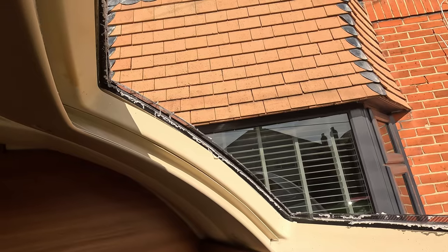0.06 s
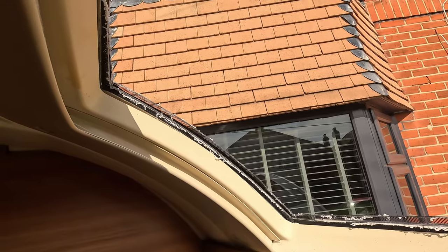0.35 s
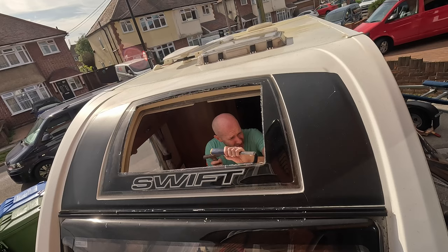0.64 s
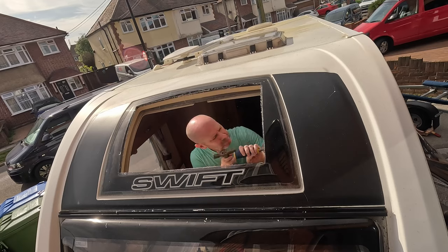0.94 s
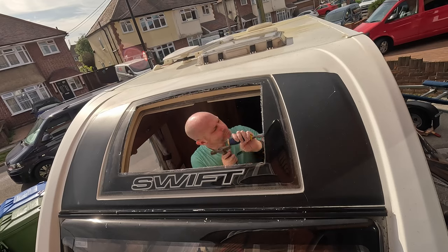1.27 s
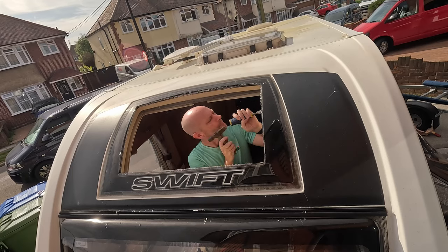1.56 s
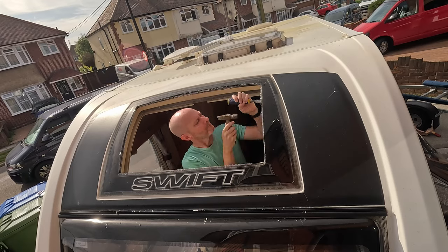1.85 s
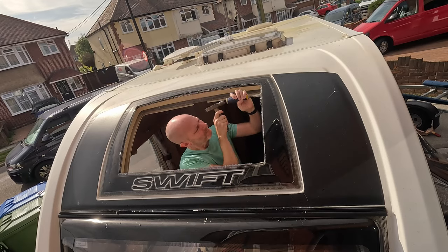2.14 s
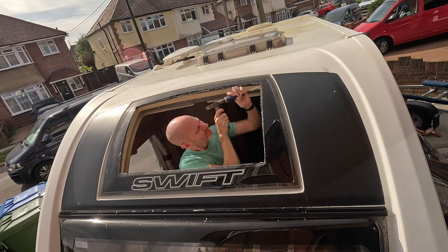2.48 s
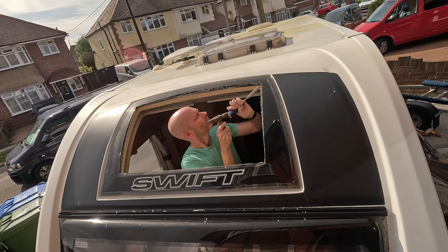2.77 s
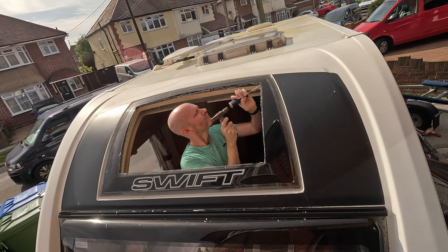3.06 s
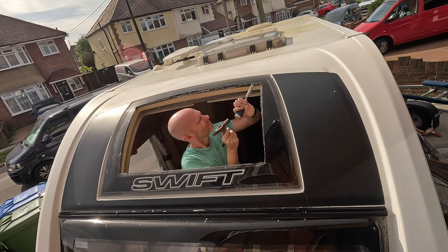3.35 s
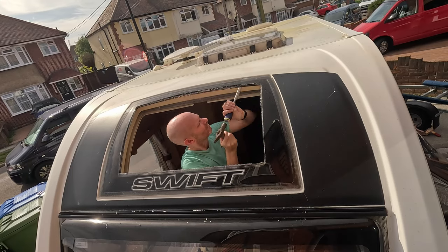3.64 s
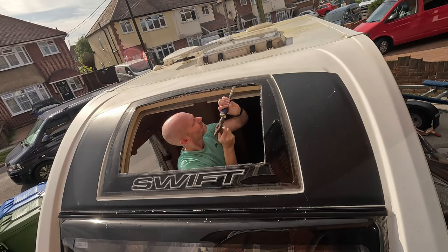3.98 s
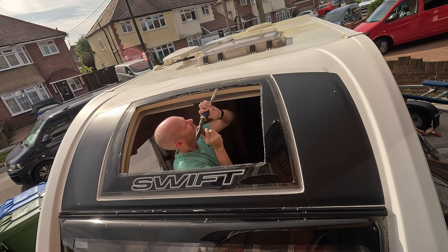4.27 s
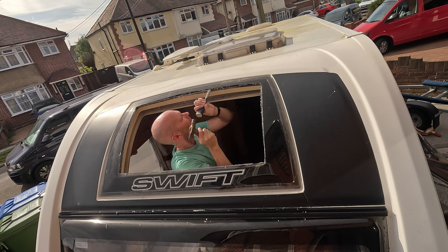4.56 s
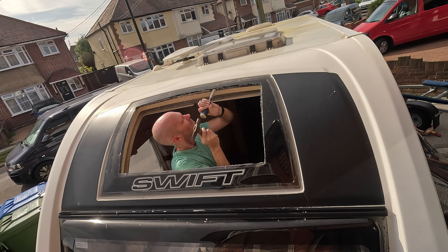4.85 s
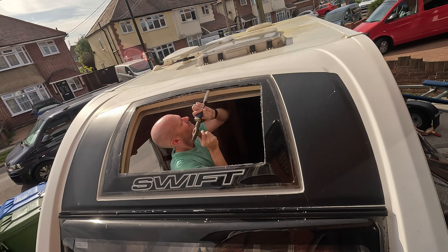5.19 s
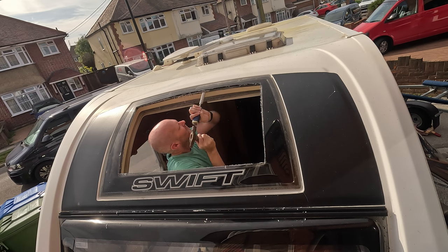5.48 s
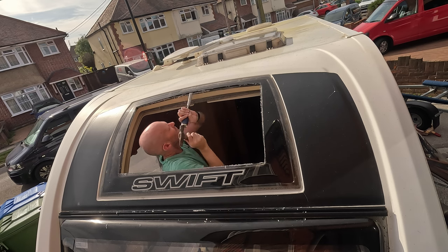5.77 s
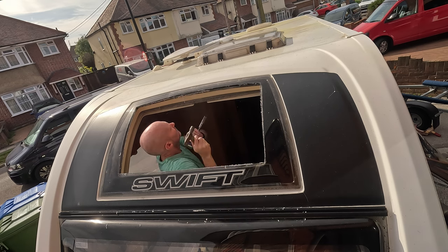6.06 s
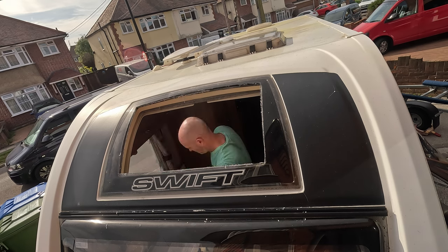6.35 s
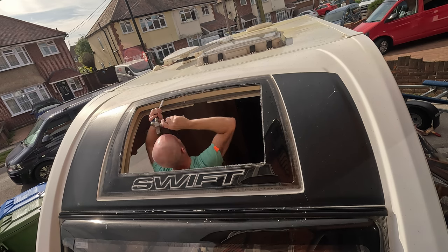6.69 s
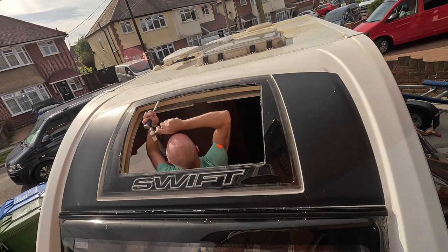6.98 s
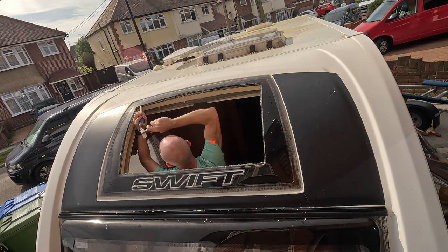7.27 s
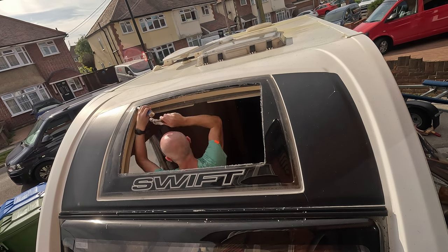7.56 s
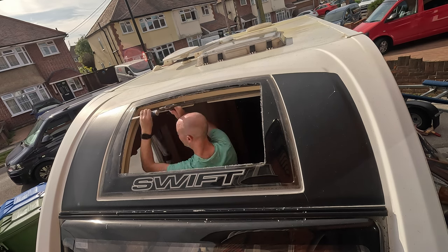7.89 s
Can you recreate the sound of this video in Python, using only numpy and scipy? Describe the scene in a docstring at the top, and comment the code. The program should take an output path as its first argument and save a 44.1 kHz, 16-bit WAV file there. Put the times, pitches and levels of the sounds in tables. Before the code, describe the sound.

Faint street air with a low rumble runs throughout. At about 0.55 seconds there is one sharp, close knock with a short hollow ring, followed by an instant of silence. From 0.7 seconds a hammer taps a chisel along a brittle plastic window frame in hurried, uneven clusters. Each tap makes a dull panel thud, a gritty rasp in the seal and a faint steel ring. Sharp plastic cracks, crumbling sealant and small scrapes fall between the taps, with stronger cracks around 1.7, 2.8 and 5 seconds. A faint low drone, like a distant engine, sits behind from 5 to nearly 7 seconds. The tapping pauses at 6 seconds and the tool rubs along the frame at about 6.3. Taps and cracks resume densely from 6.7 until the end, just after 8 seconds. The small cabin adds a very short echo.

```python
"""Chiselling a camper van window frame

A hammer taps a chisel along a brittle plastic window frame, the taps following each other quickly. Each tap
makes the wall panel thud, the seal rasp and the chisel ring faintly; sharp cracks come as the frame gives way.
Sealant crumbles around each blow and the tool rubs along the frame. The cabin adds a short echo, with street
air behind. Near the start there is one sharp, close knock."""
import sys
import numpy as np
from scipy import signal
from scipy.fft import rfft, irfft, next_fast_len
from scipy.io import wavfile
from scipy.ndimage import uniform_filter1d

SR = 44100
rng = np.random.default_rng(int(sys.argv[2]) if len(sys.argv) > 2 else 0)


def unload_audio(sound):
    """Save the sound as a 16-bit wav file, at the path given as the first command line argument."""
    columns = np.transpose(np.atleast_2d(sound))
    # keep every value between -1 and 1, then stretch to whole-number steps
    steps = np.round(np.clip(columns, -1, 1) * 32767)
    wavfile.write(sys.argv[1], SR, steps.astype(np.int16))


N = 358533
TIME = np.arange(N) / SR
BLOW_TIME = np.arange(-SR // 40, SR // 20) / SR   # from 25 ms before a blow to 50 ms after it
USUAL_BITE_DB = -46   # how loudly the blade usually bites into the seal
GRIT_DB, GRIT_DB_PER_S = -11.5, 1.36   # grit relative to the bite; the seal gets more brittle further on

# Hammer taps: start_s, panel_hz, thud_db, bite_db
TAPS = [ (0.6971, 259, -43, -51), (0.9314, 236, -40.5, -65), (1.0256, 214, -29.5, -51),
        (1.0614, 291, -25, -33.5), (1.1418, 233, -33, -43.5), (1.3264, 308, -27, -41.5),
        (1.3596, 235, -31.5, -39), (1.3935, 268, -34.5, -49.5), (1.4243, 302, -31.5, -40.5),
        (1.498, 290, -34.5, -54), (1.52, 268, -32, -46), (1.5522, 290, -39.5, -53), (1.641, 237, -31, -39),
        (1.716, 247, -33, -39.5), (1.8666, 228, -35, -55), (1.947, 233, -28, -39.5),
        (1.993, 238, -31.5, -37.5), (2.0452, 227, -39, -50), (2.07, 278, -30.5, -43),
        (2.1164, 208, -40.5, -53.5), (2.146, 198, -31.5, -45), (2.3422, 220, -37, -56),
        (2.3777, 231, -41, -55), (2.41, 186, -40.5, -52.5), (2.5597, 250, -30.5, -42.5),
        (2.9012, 235, -35.5, -54), (3.055, 248, -38, -42), (3.0894, 230, -33, -47),
        (3.124, 196, -38.5, -51), (3.4753, 190, -37.5, -58), (3.5036, 236, -25.5, -41),
        (3.5372, 198, -33, -46), (3.577, 230, -43, -46.5), (3.77, 185, -28.5, -50),
        (3.7965, 277, -31.5, -46.5), (3.83, 188, -30, -57), (3.8596, 183, -32, -47),
        (3.8897, 187, -30.5, -46.5), (3.92, 257, -25.5, -35.5), (3.9943, 235, -34, -48),
        (4.0232, 195, -28, -36.5), (4.0853, 230, -39, -48), (4.4115, 372, -42.5, -49),
        (4.438, 236, -34, -39), (4.473, 360, -32.5, -51), (4.5064, 184, -35.5, -51),
        (4.5516, 266, -30, -40), (4.6168, 254, -29.5, -39.5), (4.6462, 238, -28.5, -37.5),
        (4.677, 235, -32.5, -42.5), (4.8091, 238, -28.5, -49), (4.8218, 240, -23.5, -38.5),
        (4.854, 209, -29.5, -49), (5.001, 183, -29.5, -46), (5.4555, 276, -40, -47),
        (5.4914, 238, -33.5, -53), (5.5635, 332, -40, -62), (5.6601, 224, -28, -43.5),
        (5.689, 307, -39, -55), (5.9001, 236, -26.5, -47.5), (5.958, 252, -37, -47),
        (6.6653, 220, -31, -53.5), (6.712, 247, -42, -46), (6.7763, 254, -33, -53),
        (6.858, 266, -28.5, -40.5), (6.8898, 370, -30, -42), (6.9154, 344, -30.5, -35),
        (7.0843, 300, -35.5, -51), (7.1757, 210, -32.5, -42.5), (7.2066, 215, -29, -45.5),
        (7.261, 177, -40.5, -41.5), (7.2916, 172, -35.5, -42.5), (7.3118, 217, -28, -41.5),
        (7.3377, 217, -30, -42), (7.4971, 223, -26.5, -31), (7.5308, 243, -31.5, -45),
        (7.5588, 200, -29.5, -49), (7.5893, 205, -35.5, -44.5), (7.739, 209, -35, -43),
        (8.0058, 246, -32, -44.5), (8.0591, 243, -26.5, -39), (8.0884, 217, -34, -45)]
# Cracks in the frame, each loosening a piece: start_s, length_s, piece_hz, piece_db, splinter_db, thud_db
CRACKS = [ (.552, 0.00088, 1190, -20.5, -26.5, -35.5), (0.7988, 0.00038, 1700, -41.5, -43.5, -59),
          (0.9013, .0018, 1310, -29, -40, -53), (1.681, 0.0012, 1770, -32.5, -33.5, -34.5),
          (1.742, .00064, 1350, -52, -52.5, -59), (1.9135, 0.0014, 1270, -31.5, -50, -46),
          (2.0208, 0.0015, 2170, -42.5, -41.5, -56), (2.288, 0.0025, 1560, -36, -41, -46.5),
          (2.5235, 0.0025, 2000, -35.5, -42, -42.5), (2.7566, .0019, 2240, -37, -38.5, -39),
          (2.7745, 0.0024, 1950, -30.5, -36, -39.5), (3.4308, 0.00073, 2040, -50.5, -42.5, -44.5),
          (3.624, 0.0025, 2200, -43, -40, -51), (3.7554, 0.00064, 3100, -37.5, -41.5, -58),
          (4.8845, 0.0009, 2140, -31.5, -25, -35), (5.0314, 0.00042, 2030, -26, -25.5, -36.5),
          (5.289, 0.00053, 2180, -32, -29, -52), (5.3513, 0.0003, 2900, -57, -30.5, -42),
          (5.422, 0.0024, 2750, -43.5, -40, -42), (5.5042, 0.00068, 2340, -29, -34, -67),
          (6.701, 0.0022, 1970, -40, -47.5, -53), (6.805, 0.0016, 1450, -34, -40, -33.5),
          (6.9731, 0.00075, 1730, -33.5, -27, -47), (7.0577, 0.00066, 2340, -37, -28, -32.5),
          (7.1064, 0.0023, 2400, -38.5, -35.5, -35.5), (7.435, 0.0023, 1980, -36, -38, -60),
          (7.6585, .00052, 2160, -39, -42.5, -57), (7.7894, 0.0022, 1250, -36.5, -38.5, -46),
          (7.84, 0.0016, 1680, -31.5, -34.5, -41), (7.8706, 0.0014, 2700, -38, -34.5, -42),
          (7.9217, 0.0052, 1540, -34, -36.5, -55), (7.972, 0.0013, 2100, -32.5, -29.5, -69)]
# Scrapes of the blade along the seal: start_s, length_s, base_db
SCRAPES = [(1.11, 0.003, -60), (1.205, 0.003, -61.5), (1.561, 0.0038, -59), (1.594, 0.0017, -57),
           (1.843, 0.0023, -56), (2.211, 0.0033, -57), (2.463, 0.0029, -61), (2.964, 0.00071, -60.5),
           (3.263, 0.0028, -62), (4.166, 0.0062, -60), (4.32, 0.0017, -56.5), (5.052, 0.00054, -70),
           (5.252, 0.00072, -58), (5.631, 0.0043, -55.5), (5.756, 0.0026, -56.5), (5.929, 0.0066, -56.5),
           (6.623, 0.0016, -60), (7.033, 0.0026, -54), (7.051, 0.0039, -47)]
# Tone colours (how strong a noise is at each pitch): pitch_hz, gain_db
KNOCK_COLOUR = [(300, -22.5), (470, 5.5), (820, 5.5), (1250, -2.5), (1700, -12.5)]   # a hard knock
RASP_COLOUR = [(800, -4), (1200, 2.5), (1380, 2), (1560, 2), (1800, 1), (2100, 0.5), (2800, -2.5),
               (3800, -18)]   # the blade in the seal
GRIT_COLOUR = [(2000, -25), (2900, 0), (4900, 0), (5600, -8), (6900, -14), (8000, -23), (9200, -33),
               (10200, -24), (11500, -22), (12800, -31), (14000, -46)]   # fine, bright grit
SPLINTER_COLOUR = [(2000, 6.5), (2900, 1.5), (4900, -2), (5700, -9), (6900, -9.5), (8000, -16.5),
                   (9200, -27), (10200, -13.5), (11500, -14), (13200, -29), (16000, -27)]   # splintering plastic
WASH_COLOUR = [(280, -55), (480, 12), (1100, 8), (1900, 3.5), (3000, -35)]   # the soft rush of street air or of rubbing


def from_db(db):
    """Turn decibels into a factor to multiply a sound by."""
    return 10 ** (np.asarray(db) / 20)


def unit_level(x):
    """Scale a sound so that its average level (rms) is 1."""
    return x / np.sqrt(np.mean(x ** 2) + 1e-20)


def at_level(x, db):
    """Give a burst as much energy as 10 ms of steady sound at this level."""
    return from_db(db) * x / np.sqrt(np.sum(x ** 2) / (SR / 100) + 1e-20)


def colour(x, tone_colour):
    """Filter a sound by a tone colour, fading steeply above its last pitch."""
    hz, db = np.transpose(tone_colour)
    all_hz = np.maximum(np.fft.rfftfreq(len(x), 1 / SR), 1)
    gain = from_db(np.interp(np.log(all_hz), np.log(hz), db))
    roll_off = np.minimum(hz[-1] / all_hz, 1) ** 4
    return irfft(rfft(x) * gain * roll_off, len(x))


def resonate(x, hz, width_hz):
    """Let a sound ring at one pitch; a narrower width rings for longer."""
    r = np.exp(-np.pi * width_hz / SR)
    feedback = [1, -2 * r * np.cos(2 * np.pi * hz / SR), r * r]
    return signal.lfilter(np.array([1, 0, -1]) * (1 - r * r) / 2, feedback, x)


def noise(tone_colour):
    """Steady noise of this colour, at an average level of 1."""
    return unit_level(colour(rng.standard_normal(next_fast_len(N)), tone_colour)[:N])


def wavering_tone(hz, width_hz):
    """Noise narrowed down until it sounds like an unsteady note."""
    band = resonate(rng.standard_normal(N), hz, width_hz)
    return unit_level(resonate(band, hz, width_hz))


def swell(length_s, softness):
    """The rise and fall of a blow, centred on time zero; a soft one rises slowly."""
    shape = 2 * softness + 1
    age = np.maximum(BLOW_TIME / max(length_s, 1e-4) * np.sqrt(shape) + shape, 0)
    return age ** softness * np.exp(-age / 2)


def grains(tone_colour, uneven_db):
    """A dense run of tiny clicks of uneven size, in this colour."""
    clicks = rng.standard_normal(len(BLOW_TIME))
    sizes = from_db(uneven_db * rng.standard_normal(len(BLOW_TIME)))
    return colour(clicks * sizes, tone_colour)


def add(track, s, burst):
    """Lay a burst on the track with its time zero at s seconds."""
    at = round((s + BLOW_TIME[0]) * SR) + np.arange(len(burst))
    inside = (at >= 0) & (at < N)
    track[at[inside]] += burst[inside]


def street(rumble_gain_db, wash_gain_db, hiss_gain_db):
    """Outdoor air: a low rumble and a soft wash, with a faint hiss that follows the wash."""
    # Street levels before the gains are added: time_s, rumble_db, wash_db
    air_levels = [(0.0, -53, -53.5), (1.4, -60.5, -54.5), (1.83, -56, -57), (2.56, -61.5, -59),
                  (2.92, -55.5, -53.5), (3.19, -57.5, -57), (3.82, -59, -57.5), (4.1, -54.5, -59.5),
                  (4.69, -57, -55.5), (4.82, -57, -59.5), (6.63, -54.5, -57), (6.97, -55, -59.5),
                  (7.31, -56, -59.5), (8.13, -62, -55)]
    # Colours of the rumble and the hiss: pitch_hz, gain_db
    rumble_colour = [(20, -27.5), (50, 2.5), (100, 2.5), (200, 11.5), (300, 9), (480, 0.5), (800, -52.5)]
    hiss_colour = [(1000, -23), (1900, -3.5), (2900, -5), (4900, -14.5), (7400, -24), (9000, -39),
                   (11000, -30.5), (13000, -46), (15000, -54)]
    times, *levels = np.transpose(air_levels)
    rumble_level, wash_level = (from_db(np.interp(TIME, times, db)) for db in levels)
    rumble = from_db(rumble_gain_db) * noise(rumble_colour)
    wash = from_db(wash_gain_db) * noise(WASH_COLOUR)
    hiss = from_db(hiss_gain_db) * noise(hiss_colour)
    return rumble_level * rumble + wash_level * (wash + hiss)


def close_knock(start_s, clack_hz):
    """A sharp, close knock and clack with a short hollow ring."""
    # Colour of the ring: pitch_hz, gain_db
    hollow_colour = [(100, -2.5), (450, -17), (650, 4), (850, -0.5), (1300, -14), (2500, -25), (4800, -20),
                     (6200, -52), (12000, -47)]
    out = np.zeros(N)
    clack = np.sin(2 * np.pi * clack_hz * BLOW_TIME) * swell(length_s=0.00097, softness=1.6)
    knock = grains(KNOCK_COLOUR, uneven_db=7) * swell(length_s=0.0018, softness=0.52)
    ring = grains(hollow_colour, uneven_db=6) * swell(length_s=0.0075, softness=0.2)
    add(out, start_s, at_level(knock, db=-26.5))
    add(out, start_s + 0.0004, at_level(clack, db=-22))
    add(out, start_s + 0.0085, at_level(ring, db=-27.5))
    return out


def cracks():
    """The frame breaks: it knocks, the loose piece rings, splinters fly and the panel springs back."""
    # Usual pitch of the splinters along the frame: time_s, pitch_hz
    splinter_pitches = [(.55, 4100), (1.0, 3600), (3.7, 3540), (5.2, 3660), (7.1, 4400), (8.0, 4100)]
    usual_splinter_db, hz_per_db = -31, 39   # a harder snap splinters at a higher pitch
    out = np.zeros(N)
    for s, length_s, piece_hz, piece_db, splinter_db, thud_db in CRACKS:
        softness = 0.89 + (length_s / 0.0013) ** 2   # a clean snap starts at once, a long tear builds up
        snap = swell(length_s, min(softness, 6))
        strain = from_db(-23.5) * np.exp(-np.abs(BLOW_TIME) / 0.0021)   # the plastic strains and settles
        burst = snap / snap.max() + strain
        splinter_hz = np.interp(s, *np.transpose(splinter_pitches))
        splinter_hz += hz_per_db * (splinter_db - usual_splinter_db)
        knock = grains(KNOCK_COLOUR, uneven_db=3.5) * swell(length_s * 0.87, softness=0.47)
        knock_db = (piece_db + thud_db) / 2 - 1.5
        piece = resonate(grains(RASP_COLOUR, uneven_db=3), piece_hz, width_hz=315) * burst
        spray = resonate(splinters(length_s), splinter_hz, width_hz=2000) * burst
        add(out, s, at_level(knock, knock_db) + at_level(piece, piece_db) + at_level(spray, splinter_db))
        add(out, s + 0.0014, panel_thud(hz=263, db=thud_db, length_s=0.0011, boom_db=-20.5))
    return out


def splinters(length_s):
    """The grains of a crack: the shorter it is, the more treble they have above 7000 Hz."""
    db_per_octave = 0.5 * np.log2(0.001 / length_s)
    tilted = [(hz, db + db_per_octave * np.log2(max(hz / 7000, 1))) for hz, db in SPLINTER_COLOUR]
    return grains(tilted, uneven_db=6.5)


def panel_thud(hz, db, length_s, boom_db):
    """The wall swings about twice at its pitch, over a blurred boom of its other vibrations."""
    # Colour of the wall's boom: pitch_hz, gain_db
    boom_colour = [(25, -15), (60, -54), (110, -2), (230, -2.5), (340, -0.5), (480, -9), (900, -50.5)]
    swing = np.sin(2 * np.pi * (hz * BLOW_TIME + rng.random())) * swell(length_s, softness=13)
    boom = grains(boom_colour, uneven_db=4) * swell(length_s=0.0038, softness=7.5)
    return at_level(at_level(swing, 0) + at_level(boom, boom_db), db)


def cabin_echo(x, db, fade_s):
    """Sound bounces around the furnished cabin, dying away by 60 dB in fade_s."""
    # Colour of the echo: pitch_hz, gain_db
    echo_colour = [(60, -7), (250, -2.5), (600, -0.5), (2000, 13), (5000, -15.5), (14000, 3)]
    t = TIME[:SR // 4]
    tail = colour(rng.standard_normal(len(t)), echo_colour) * from_db(-60 * t / fade_s) * (t > 0.003)
    return from_db(db) * signal.fftconvolve(x, tail / np.sqrt(np.sum(tail ** 2)))[:N]


def crumbling(hiss_db, rub_db, lag_s, length_s):
    """Old sealant crumbles for a moment around every blow, a little more after a hard one."""
    blows = [(s, db) for s, _, _, db in TAPS]
    blows += [(s, db) for s, _, _, _, db, _ in CRACKS]
    blows += [(s, db) for s, _, db in SCRAPES]
    power = np.zeros(N)
    puff = np.exp(-((TIME[:SR // 4] + BLOW_TIME[0] - lag_s) / length_s) ** 2)
    for s, db in blows:
        add(power, s, puff * from_db(0.47 * (db - USUAL_BITE_DB)) ** 2)
    crumbs = from_db(hiss_db) * grainy_hiss(flutter_db=3) + from_db(rub_db) * noise(WASH_COLOUR)
    return np.sqrt(power) * crumbs


def grainy_hiss(flutter_db):
    """Hiss whose level flutters from grain to grain."""
    # Colour of the hiss: pitch_hz, gain_db
    hiss_colour = [(1200, -16), (2100, 1), (2900, -4), (3600, -3), (4900, -4), (6000, -14), (7400, -22),
                   (9000, -42), (10500, -35), (13000, -43), (15000, -64)]
    hiss = noise(hiss_colour)
    flutter = unit_level(uniform_filter1d(rng.standard_normal(N), size=300))
    return hiss * from_db(flutter_db * flutter)


def slides():
    """The tool rubs along the frame: a gritty hiss and a lower rub swell and fade together."""
    # Long strokes of the tool: loudest_s, rise_s, fade_s, hiss_db, rub_db
    strokes = [ (.685, 0.037, 0.023, -51, -53), (1.79, 0.022, 0.029, -57.5, -49.5),
               (2.31, 0.017, 0.069, -59, -55.5), (2.733, 0.017, 0.049, -46, -47),
               (2.85, 0.034, 0.072, -57, -63), (3.09, 0.022, .035, -65, -78),
               (3.67, 0.039, 0.051, -50, -54.5), (4.42, 0.019, 0.091, -64, -63),
               (6.26, .011, 0.014, -42, -43), (6.318, 0.03, 0.04, -48.5, -49),
               (8.07, 0.068, 0.038, -54.5, -62)]
    hiss_level, rub_level = np.zeros(N), np.zeros(N)
    for s, rise_s, fade_s, hiss_db, rub_db in strokes:
        stroke = np.exp(-0.5 * ((TIME - s) / np.where(TIME < s, rise_s, fade_s)) ** 2)
        hiss_level += from_db(hiss_db) * stroke
        rub_level += from_db(rub_db) * stroke
    return hiss_level * grainy_hiss(flutter_db=1.5) + rub_level * noise(WASH_COLOUR)


def taps():
    """The blade bites into the seal with a gritty rasp; the frame knocks and the panel thuds."""
    # The frame's pitch where the chisel stands: time_s, pitch_hz
    frame_pitches = [(1.06, 760), (1.4, 540), (1.95, 910), (3.5, 785), (4.0, 770), (4.45, 560), (4.8, 680),
                     (5.9, 590), (6.86, 724), (8.1, 630)]
    usual_knock_db, usual_thud_db, usual_panel_hz = -46.5, -32, 240
    hard_tap_db, spread_octaves = -30, 0.15
    out = np.zeros(N)
    for s, panel_hz, thud_db, bite_db in TAPS:
        knock_db = usual_knock_db + (thud_db - usual_thud_db) + 0.28 * (bite_db - USUAL_BITE_DB)
        knock_db += 8.5 * np.log2(panel_hz / usual_panel_hz)   # louder where the wall is stiff
        knock_db += 0.54 * max(thud_db - hard_tap_db, 0)   # a hard tap drives through to the frame
        grit_db = bite_db + GRIT_DB + GRIT_DB_PER_S * s
        frame_hz = np.interp(s, *np.transpose(frame_pitches))
        frame_hz *= 2 ** (spread_octaves * rng.uniform(-1, 1))
        bite = swell(length_s=0.0019, softness=6.1)
        knock = resonate(grains(KNOCK_COLOUR, uneven_db=4), frame_hz, width_hz=275) * bite
        rasp = grains(RASP_COLOUR, uneven_db=7) * bite
        grit = grains(GRIT_COLOUR, uneven_db=6.5) * bite
        crunch = at_level(knock, knock_db) + at_level(rasp, bite_db) + at_level(grit, grit_db)
        add(out, s, panel_thud(panel_hz, thud_db, length_s=0.0019, boom_db=-6.5))
        add(out, s - 0.0005, crunch)   # the contact comes just before the heavy panel moves
    return out


def chisel_rattle(gain_db, lowest_fade_s, spread_db):
    """Every tap leaves the blade rattling in its cut at several pitches, until the hand damps it."""
    # The chisel's rattling tones: pitch_hz, width_hz, gain_db
    tones = [(2120, 220, 0), (2680, 150, -5), (3470, 190, -2), (3980, 200, -6), (4680, 260, -3),
             (5080, 220, -7), (11390, 130, -26), (12610, 150, -33)]
    out = np.zeros(N)
    tap_s, _, _, bite_db = np.transpose(TAPS)
    at = np.clip((tap_s * SR).astype(int), 0, N - 1)
    grit_db = bite_db + GRIT_DB + GRIT_DB_PER_S * tap_s
    blow_db = np.minimum(grit_db, -47) + gain_db   # gritty taps ring more, up to a point
    for hz, width_hz, tone_db in tones:
        fade_s = lowest_fade_s * (tones[0][0] / hz) ** 0.5   # high tones die sooner
        decay = from_db(-60 / (fade_s * SR))
        kicks = np.zeros(N)
        kicks[at] = from_db(blow_db + tone_db + spread_db * rng.standard_normal(len(at)))
        rattle = rng.standard_normal(N) * signal.lfilter([1], [1, -decay], kicks + 1e-18)
        ring = resonate(resonate(rattle, hz, width_hz), hz, 4 * width_hz)
        out += ring * np.sqrt(SR / (np.pi * width_hz))   # make up the level lost in filtering
    return out


def chips(per_s, db, spread_db):
    """Small chips tick off after some of the taps."""
    out = np.zeros(N)
    share_of_taps = per_s * TIME[-1] / len(TAPS)
    for (s, *_), (chance, delay, size, pitch) in zip(TAPS, rng.random((len(TAPS), 4))):
        chip = resonate(grains(SPLINTER_COLOUR, uneven_db=10), 2300 + 2000 * pitch, width_hz=560)
        tick = at_level(chip * swell(length_s=0.00067, softness=2.2), db + spread_db * (size - 0.5))
        if chance < share_of_taps:
            add(out, s + 0.0057 + 0.046 * delay, tick)
    return out


def nudges(per_s, loudest_db, spread_db):
    """The tools nudge the panel lightly just after some of the taps."""
    out = np.zeros(N)
    share_of_taps = per_s * TIME[-1] / len(TAPS)
    for (s, *_), (chance, delay, size) in zip(TAPS, rng.random((len(TAPS), 3))):
        nudge = panel_thud(hz=245, db=loudest_db - spread_db * (1 - size), length_s=0.0021, boom_db=-3)
        if chance < share_of_taps:
            add(out, s + 0.029 + 0.0202 * delay, nudge)
    return out


def scrapes():
    """The blade drags briefly through old sealant, with bright grit over a louder rasp."""
    out = np.zeros(N)
    for s, length_s, base_db in SCRAPES:
        drag = swell(length_s, softness=2.9)
        add(out, s, at_level(grains(GRIT_COLOUR, uneven_db=14) * drag, base_db + 3))
        add(out, s, at_level(grains(RASP_COLOUR, uneven_db=0.5) * drag, base_db + 8))
    return out


def clinks():
    """Now and then the hammer meets the chisel squarely, and the steel rings brightly."""
    # Square hits: start_s, level_db
    hits = [(1.327, -65), (2.07, -64), (4.6176, -59), (5.4555, -60), (5.505, -62), (5.8999, -64),
            (5.9575, -56), (6.803, -55)]
    # The steel's tones, each dying by 60 dB in its fade time: pitch_hz, gain_db, fade_s
    tones = [(4511, 0, .05), (5163, -2, .06), (11390, -2, .036), (12610, -10, .036)]
    out = np.zeros(N)
    age = np.maximum(BLOW_TIME, 0)
    ring = sum(np.sin(2 * np.pi * hz * age) * from_db(db - 60 * age / fade_s) for hz, db, fade_s in tones)
    for s, db in hits:
        add(out, s, at_level(ring, db))
    return out


def whistle(hz, width_hz, db, length_s):
    """Twice a faint high whistle rises out of the street."""
    swells = sum(np.exp(-((TIME - s) / length_s) ** 2) for s in (4.75, 6.48))
    return from_db(db) * wavering_tone(hz, width_hz) * swells


def drone(hz, width_hz, db):
    """A low wavering drone, like a far engine, comes and goes."""
    fade = np.interp(TIME, [4.9, 5.1, 6.2, 6.8], [0, 1, 1, 0])
    return from_db(db) * wavering_tone(hz, width_hz) * fade


def scene():
    """The work, its echo and the street; all sound drops out briefly after the close knock."""
    ringing = chisel_rattle(gain_db=-13, lowest_fade_s=0.14, spread_db=5) + clinks()
    small_sounds = scrapes() + chips(per_s=2, db=-59, spread_db=6)
    small_sounds += nudges(per_s=1.2, loudest_db=-45, spread_db=6)
    rubbing = crumbling(hiss_db=-67, rub_db=-71, lag_s=0.013, length_s=0.028) + slides()
    work = taps() + cracks() + ringing + small_sounds + rubbing
    nearby = work + close_knock(start_s=0.552, clack_hz=1200)
    outside = street(rumble_gain_db=1.5, wash_gain_db=-3.5, hiss_gain_db=-14)
    outside += drone(hz=109.2, width_hz=19, db=-57.5)
    outside += whistle(hz=4430, width_hz=600, db=-65, length_s=0.026)
    mix = nearby + cabin_echo(nearby, db=-19.5, fade_s=0.016) + outside
    gap = (TIME > 0.578) & (TIME < 0.598)
    return (mix * uniform_filter1d(1.0 - gap, size=40))[None]


def record(dry):
    """Cut the very highest treble steeply: 70 dB down from 16700 Hz upward."""
    return signal.sosfilt(signal.cheby2(14, 70, 16700, fs=SR, output="sos"), dry)


dry = scene()
out = record(dry)
unload_audio(out)
```